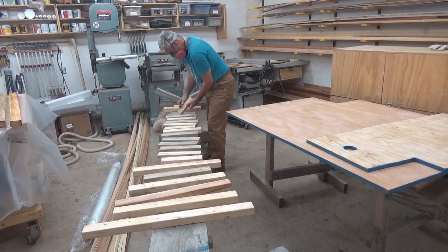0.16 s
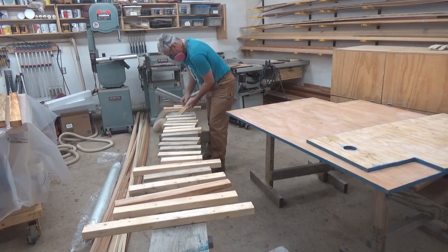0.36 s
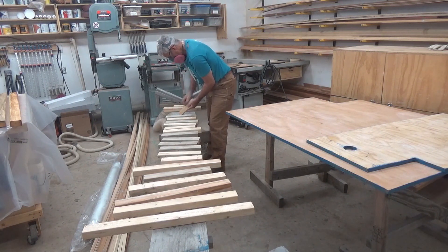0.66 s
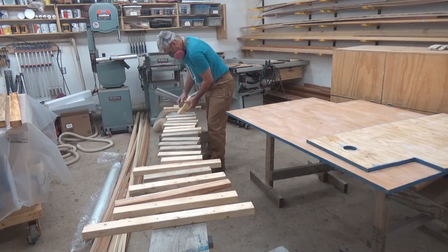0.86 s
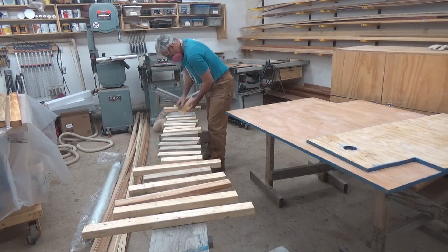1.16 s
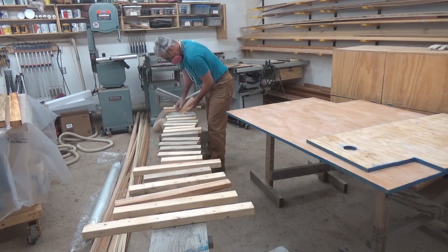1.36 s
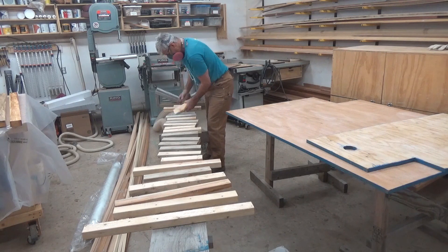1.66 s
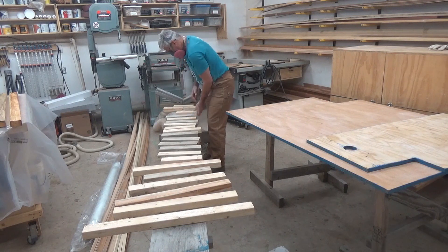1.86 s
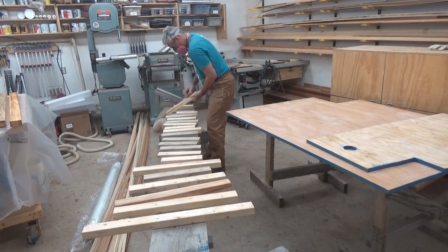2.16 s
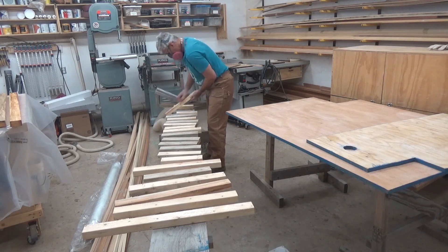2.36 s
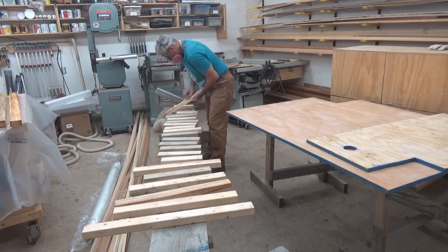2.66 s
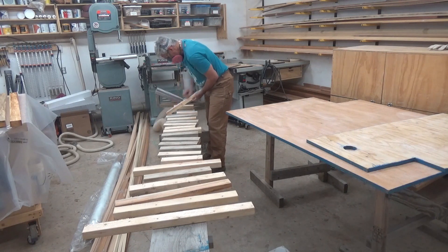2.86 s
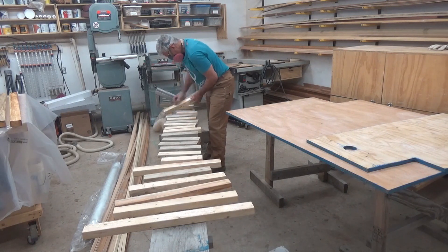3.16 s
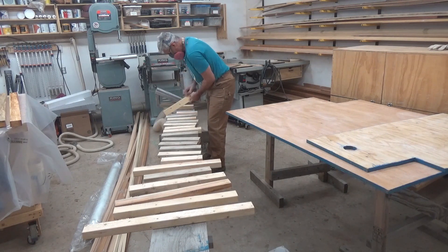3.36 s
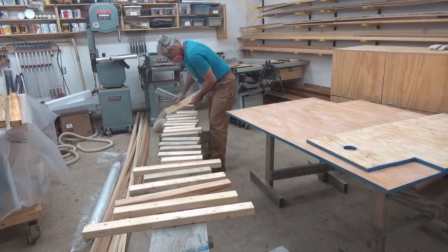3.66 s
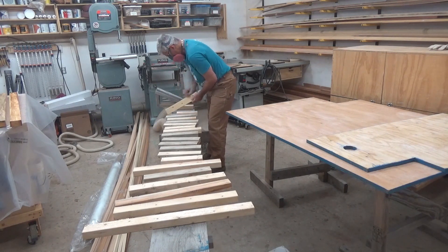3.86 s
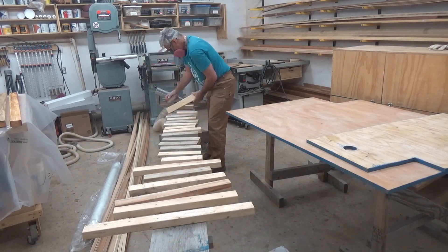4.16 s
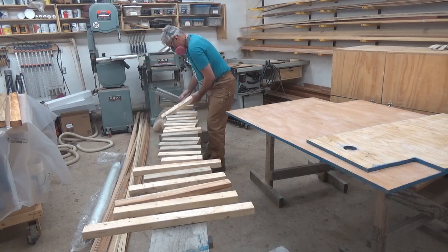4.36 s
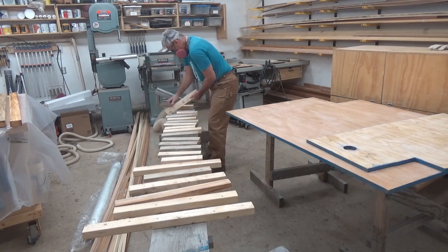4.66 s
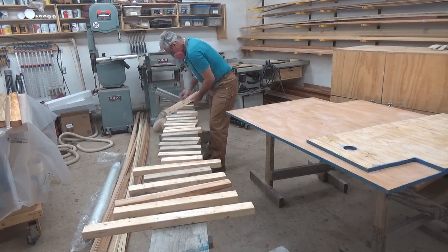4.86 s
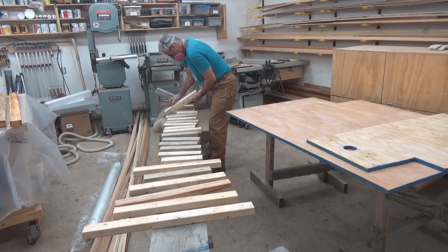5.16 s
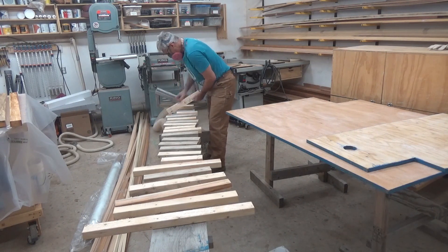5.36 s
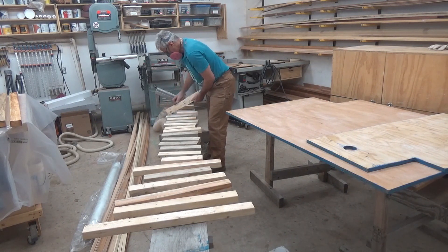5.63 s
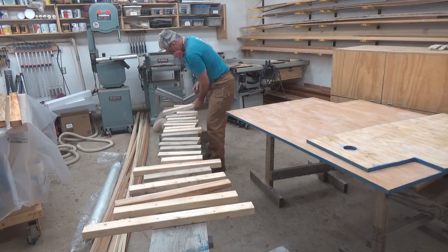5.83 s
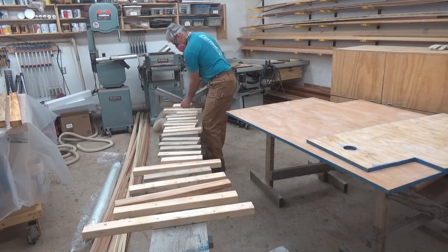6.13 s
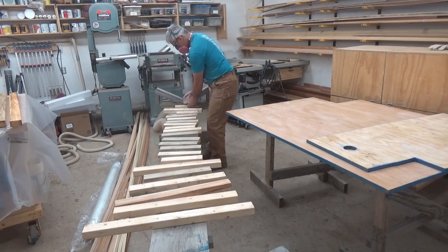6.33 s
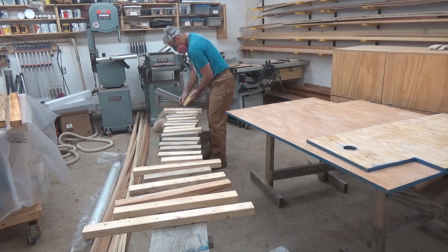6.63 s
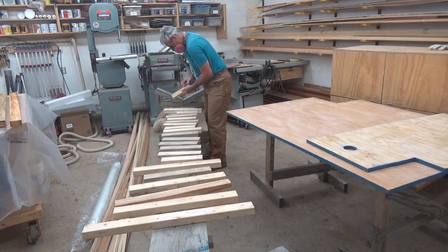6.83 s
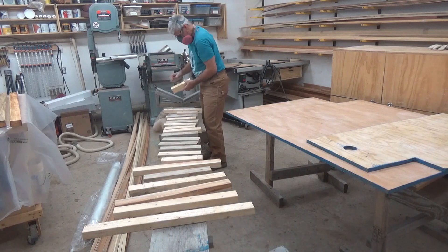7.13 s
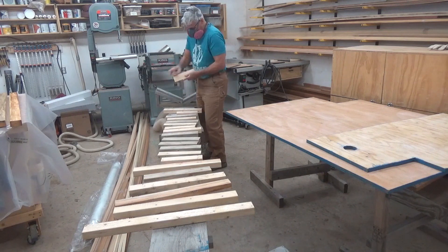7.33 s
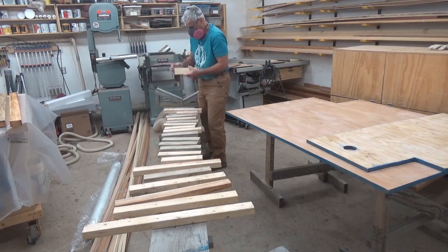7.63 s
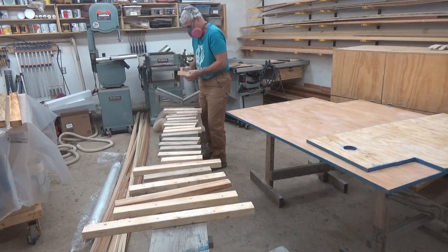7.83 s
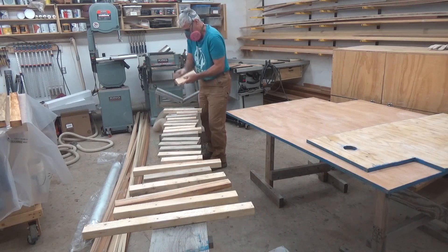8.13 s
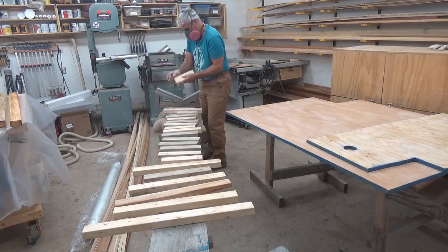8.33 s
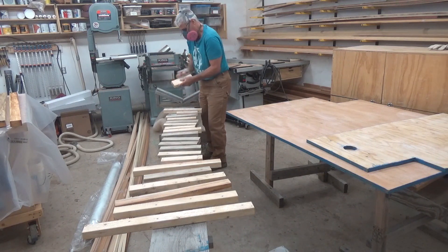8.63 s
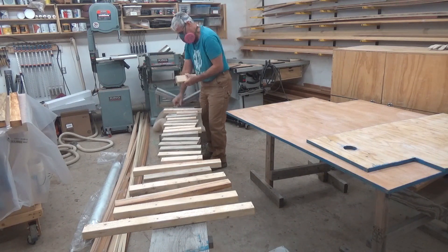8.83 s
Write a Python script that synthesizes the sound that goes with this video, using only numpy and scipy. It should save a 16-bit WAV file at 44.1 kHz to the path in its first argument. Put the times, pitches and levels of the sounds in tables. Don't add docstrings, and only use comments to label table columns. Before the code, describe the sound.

Sandpaper rasps quickly back and forth on wooden battens in a hard workshop, with loose wood knocking and clattering between spells of sanding.

```python
import sys
import numpy as np
from scipy import signal
from scipy.fft import rfft, irfft
from scipy.io import wavfile
from scipy.ndimage import uniform_filter1d

SR = 44100
rng = np.random.default_rng(int(sys.argv[2]) if len(sys.argv) > 2 else 0)


def pcm_store(signal):
    levels = np.round(np.clip(np.atleast_2d(signal), -1, 1) * 32767)
    wavfile.write(sys.argv[1], SR, levels.astype(np.int16).T)


def linear_from_db(decibels):
    return 10 ** (np.asarray(decibels, float) / 20)


N = 396459
T = np.arange(N) / SR
HZ = np.fft.rfftfreq(N, 1 / SR)
SWAP_S = 6.2


def level(x, db):
    return x * linear_from_db(db) / np.sqrt(np.mean(x ** 2))


def along(points, hz):
    f, v = np.transpose(points)
    return np.interp(np.log(hz + 1), np.log(f), v)


def shape(x, gain):
    return irfft(rfft(x) * gain, N)


def bump(hz, width_hz):
    return 1 / (1 + 2j * (HZ - hz) / width_hz)


def modes(table):
    return sum(linear_from_db(db) * bump(hz, width_hz) * (-1) ** k for k, (hz, width_hz, db) in enumerate(table))


def band_noise(noise, order, low_hz, high_hz):
    sos = signal.butter(order, [low_hz, high_hz], "band", fs=SR, output="sos")
    return signal.sosfilt(sos, noise)


def walk(rate):
    k = int(SR / rate)
    return uniform_filter1d(np.repeat(rng.standard_normal(N // k + 1), k), k)[:N]


def add(track, s, sound):
    i = int(s * SR)
    track[i:i + len(sound)] += sound[:N - i]


def grit(per_s, scatter_db):
    hits = rng.random(N) < per_s / SR
    return hits * rng.standard_normal(N) * linear_from_db(scatter_db * rng.exponential(size=N))


def swells(rows, power, lag_s=0.):
    out = np.zeros(N)
    for s, db, rise_s, fall_s in rows:
        rise_s = rise_s + lag_s
        peak_s = s + lag_s
        i = slice(max(int((peak_s - rise_s) * SR), 0), int((peak_s + fall_s) * SR))
        late = T[i] - peak_s
        speed = np.abs(np.cos(np.pi / 2 * late / np.where(late < 0, rise_s, fall_s)))
        out[i] += linear_from_db(2 * db) * speed ** (2 * power)
    return uniform_filter1d(np.sqrt(out), size=200)


# (time of top speed [s], rasp level [dB], rise [s], fall [s], pressure [dB])
BATTEN_STROKES = [(0.07, -24.5, 0.15, 0.16, -5), (2.465, -33.5, 0.09, 0.14, -4),
                  (2.689, -22.5, 0.15, 0.2, 0), (3.022, -21.5, 0.17, 0.088, -0.5),
                  (3.205, -21.5, 0.19, 0.19, 1), (3.47, -25.5, 0.17, 0.15, 0),
                  (3.665, -21.5, 0.13, 0.14, 0), (3.907, -25.5, 0.19, 0.13, 0.5),
                  (4.12, -21, 0.13, 0.14, -1), (4.33, -26, 0.17, 0.17, -0.5),
                  (4.528, -22, 0.12, 0.13, -1.5), (4.75, -26.5, 0.21, 0.16, -0.5),
                  (4.966, -21.5, 0.12, 0.14, 0), (5.189, -24.5, 0.19, 0.14, -0.5),
                  (5.397, -21, 0.14, 0.16, -1.5), (5.623, -25, 0.157, 0.17, -1),
                  (5.846, -25.5, 0.13, 0.14, -4)]
# (time of top speed [s], rasp level [dB], rise [s], fall [s], pressure [dB])
BLOCK_STROKES = [(6.559, -20, 0.118, 0.11, 3), (6.769, -18, 0.14, 0.15, 2), (7.02, -22, 0.18, 0.12, 2),
                 (7.243, -19, 0.15, 0.14, 2), (7.472, -21, 0.16, 0.14, 0.5), (7.69, -19.5, 0.15, 0.17, 1.5),
                 (7.907, -21.5, 0.14, 0.15, -0.5), (8.129, -20.5, 0.14, 0.15, 1),
                 (8.366, -25, 0.21, 0.15, 0.5), (8.574, -22, 0.14, 0.15, -1.5), (8.819, -28, 0.26, 0.18, 0),
                 (9.006, -32, 0.09, 0.14, -3)]
# (time [s], rasp level [dB], rise [s], fall [s], pressure [dB])
PUSHES = [(.06, -27.5, 0.11, 0.14, 5), (2.46, -29.5, 0.089, 0.047, 3.5), (2.51, -35, 0.064, 0.045, 9.5),
          (5.89, -34.5, 0.072, 0.056, 8.5), (2.63, -24, 0.056, 0.19, 1.5), (3.05, -26.5, 0.055, 0.024, 0),
          (3.2, -24.5, 0.062, 0.054, -8), (4.11, -27.5, 0.037, 0.088, -8), (5.87, -42, 0.064, 0.021, -4),
          (6.5, -24, 0.066, 0.1, 5), (8.82, -30.5, 0.044, 0.022, -11)]


def strokes(db, strength, power, share, lag_s, block_db):
    usual_db = -22
    rows = []
    for s, rasp_db, rise_s, fall_s, press_db in BATTEN_STROKES + BLOCK_STROKES + PUSHES:
        peak_db = usual_db + db + strength * (rasp_db - usual_db) + share * press_db
        rows.append((s, peak_db + block_db * (s > SWAP_S), rise_s, fall_s))
    return swells(rows, power, lag_s)


# (frequency [Hz], density [dB per Hz])
RASP_BATTEN = [(35, -47), (60, -33), (103, -14), (178, -16.5), (203, -13.5), (329, -5.5), (409, -13),
               (487, -8), (780, -18), (999, -10), (1220, -14.5), (2970, -6), (4210, -2), (5240, -1),
               (11000, -3), (14300, -45), (22000, -120)]
# (frequency [Hz], density [dB per Hz])
RASP_BLOCK = [(35, -46), (60, -15), (101, -8.5), (182, -15.5), (288, -7), (436, -9), (476, -5),
              (780, -16.5), (978, -8), (1220, -15), (1720, -10), (2050, -9.5), (3460, -2.5), (5970, 0),
              (11000, -1.5), (14300, -46), (22000, -120)]
# (frequency [Hz], width [Hz], level [dB])
BATTEN = [(2193, 310, -6), (2900, 115, -1.5), (3460, 190, -6.5), (5170, 390, -5.5), (5910, 490, -2.5)]
# (frequency [Hz], width [Hz], level [dB])
BLOCK = [(1675, 79, -17), (2990, 160, 0.5), (3460, 59, 3), (5060, 320, 5), (5300, 680, 3), (6400, 400, 1)]
# (level [dB], strength share
# [1], speed power [1], pressure share [1], lag [s], extra on block [dB])
RASP_LAW = (-0.22, 1.06, 1.32, -0.28, 0.016, 0.19)
HISS_LAW = (1.37, 1.16, 1.51, -0.54, -0.012, -0.48)
BOARD_LAW = (-5, 0.7, 0.65, 0.79, -0.0233, 2)
BODY_LAW = (-8, 0.93, 1, 0.8, -0.01, 1.5)
RUMBLE_LAW = (-17, 1, 1.06, -0.07, 0.28, -1)


def sanding():
    fine = grit(30000, .8) * linear_from_db(.6 * walk(60) + .8 * walk(150))
    coarse = grit(800, 1.8) * linear_from_db(3 * walk(14))
    woods = []
    for spectrum, wood in ((RASP_BATTEN, BATTEN), (RASP_BLOCK, BLOCK)):
        hiss = level(shape(fine, linear_from_db(along(spectrum, HZ))), 0.25)
        pings = level(shape(coarse, modes(wood)), -10)
        woods.append(hiss + pings)
    rasp = np.where(T < SWAP_S, *woods)
    low, body, middle, high = (1 / (1 + (HZ / edge_hz) ** 8) for edge_hz in (1164, 2420, 4460, 7100))
    layers = [(high - middle, -.8, RASP_LAW), (1 - high, -.6, HISS_LAW), (middle - body, -1.4, BOARD_LAW),
              (body - low, -2.5, BODY_LAW), (low, -3.5, RUMBLE_LAW)]
    out = np.zeros(N)
    for band, db, law in layers:
        flicker = linear_from_db(.7 * walk(30))
        out = out + level(shape(rasp, band), db) * strokes(*law) * flicker
    return out


# (time [s], peak level [dB], frequency [Hz])
CATCHES = [(2.4058, -22, 4940), (2.5754, -16, 3640), (2.6168, -4, 5370), (2.91, -15, 7610),
           (3.014, -1, 5300), (3.0499, 3.5, 4670), (3.118, -10, 6220), (3.17, -1, 5840), (3.203, -1, 5070),
           (3.5896, -9, 6260), (4.4686, -7, 5300), (6.4582, -10, 3350), (6.4814, 1, 5170), (6.521, 5, 3480),
           (6.5816, 5, 4400), (6.6849, 4.5, 4700), (6.79, -2, 3100), (6.825, -3, 2900), (6.9896, 1, 6660),
           (7.0722, 1, 4670), (7.1504, 0, 5300), (7.5092, 3.5, 4340), (7.614, -1, 5100), (7.6943, -3, 5590),
           (7.8819, -9, 6840), (7.9647, -1, 4930), (8.057, -3, 3550), (8.1363, -3, 5590),
           (8.3294, -3.5, 5260), (8.411, 0, 4400), (8.428, -8, 3460), (8.506, 1, 4400)]


def catches():
    out, t = np.zeros(N), T[:SR // 20]
    for s, db, hz in CATCHES:
        tear = rng.standard_normal(len(t))
        pitched = level(band_noise(tear, 2, hz * 0.86, hz * 1.14), 0)
        wide = level(band_noise(tear, 2, 2900, 6600), 1.5)
        envelope = (1 - np.exp(-t / 0.0014)) * np.exp(-t / 0.0084)
        add(out, s, level((pitched + wide) * envelope, db - 23.0))
    return out


def flecks(count=600):
    out, t = np.zeros(N), T[:SR // 40]
    low_hz, high_hz, peak_s = 3000, 7500, .0013
    for when, pitch, size, slide in rng.random((count, 4)):
        hz = low_hz * (high_hz / low_hz) ** pitch * (1 + 8 * (slide - .5) * t)
        envelope = t / peak_s * np.exp(1 - t / peak_s)
        add(out, when * T[-1], linear_from_db(7.5 * size) * np.sin(2 * np.pi * hz * t) * envelope)
    return out * strokes(db=-4, strength=1, power=1.3, share=0, lag_s=0, block_db=4)


# (level [dB], strength share [1], speed power [1], pressure share [1], lag [s], extra on block [dB])
SING_LAW = (-25, 1.1, 3.5, 1.5, 0.07, -5)
# (time [s], level [dB], rise [s], fall [s])
SING_SWELLS = [(2.11, -52, .06, .05), (2.47, -38, 0.07, 0.074), (5.9, -44, 0.1, 0.1),
               (6.03, -45, 0.06, 0.1), (6.47, -43, 0.04, 0.07), (7.81, -44, 0.076, 0.1)]


def singing():
    hz = 1010 * (1 + 0.01184 * walk(25))
    steady = np.sin(2 * np.pi * np.cumsum(hz) / SR) * linear_from_db(2.2 * walk(40))
    rough = shape(grit(3000, 0.96), bump(997, 70))
    drive = np.hypot(strokes(*SING_LAW), swells(SING_SWELLS, 0.84))
    return (level(rough, -0.5) + level(steady, -2.0)) * drive


def ring(table, t):
    out = np.zeros(len(t))
    for hz, db, t60_s in table:
        detuned_hz = hz * (1 + 0.022 * rng.standard_normal())
        out = out + linear_from_db(db) * np.sin(2 * np.pi * detuned_hz * t) * 1000. ** (-t / t60_s)
    return out


# (time [s], peak level [dB], loudest mode [Hz], hardness [dB], t60 [s])
KNOCKS = [(0.085, -19.5, 328, -3, 0.049), (0.179, -23, 272, -8, 0.029), (0.787, -2.5, 314, -19, 0.041),
          (1.048, -6, 308, -11, 0.048), (1.2, -2, 315, -4, 0.032), (1.203, -1, 665, -5, 0.024),
          (1.219, -8, 500, 1.5, 0.042), (1.244, -1.5, 281, -2.5, 0.011), (1.279, -4.5, 330, -6, 0.042),
          (1.329, -8, 478, -13, 0.066), (1.36, -12.5, 420, -7, 0.042), (1.389, -16, 280, -4.5, 0.029),
          (1.674, -4, 329, -16.5, 0.04), (1.861, -24.5, 318, -7, 0.032), (1.938, -22, 344, -10, 0.05),
          (1.288, -6, 258, -4.5, 0.02), (6.109, -38, 220, -12, 0.081)]
# (time [s], peak level [dB], frequency [Hz])
BOUNCES = [(0.0, -17, 320), (0.026, -20, 285), (0.056, -16.5, 320), (0.25, -38, 247), (0.812, -20, 310),
           (0.872, -21, 300), (0.859, -20, 265), (0.898, -13, 273), (0.935, -19, 290), (1.029, -19, 328),
           (1.068, -22, 300), (1.09, -13, 345), (1.119, -17, 434), (1.706, -20, 249), (1.745, -16, 292),
           (1.795, -17, 236), (1.815, -20, 300), (1.905, -22, 350), (2.11, -25, 260), (2.02, -19.5, 322),
           (2.157, -23, 291), (6.032, -18, 316), (6.06, -17, 224), (6.156, -26, 252), (6.982, -29, 455),
           (7.318, -29, 474), (7.36, -27, 300), (7.39, -27, 310), (7.818, -26, 310), (8.242, -30, 498),
           (8.714, -29, 296)]
# (frequency [Hz], level [dB], t60 [s])
BENCH = [(211, -9, 0.064), (266, -5, 0.052), (420, -3, 0.026), (488, -11, 0.064), (614, -5, 0.028),
         (718, -15, 0.036), (993, -15.5, 0.036), (1255, -30, 0.025)]
# (frequency [Hz], level [dB])
WOOD = [(450, 5), (620, 6), (800, 1.5), (1100, -1), (1500, -10.5), (2100, -16), (3500, -32)]


def knocks():
    out, t = np.zeros(N), T[:SR // 3]
    bounce_hard_db, bounce_t60_s = -22, 0.032
    bounces = [(*row, bounce_hard_db, bounce_t60_s) for row in BOUNCES]
    for s, db, hz, hard_db, t60_s in sorted(KNOCKS + bounces):
        settling = 0.24 + 0.93 / (1 + (t / 0.016) ** 6)
        swell = (t / 0.0062) ** 2 / (1 + (t / 0.005) ** 2) * settling
        low = 0.29 * ring(BENCH, t) * (1 - np.exp(-t / 0.0062))
        low = low + ring([(hz, 0, 1.47 * t60_s)], t) * swell
        stack = [(f, along(WOOD, f) + 0.36 * rng.standard_normal(), 0.11 * (500 / f) ** 0.24)
                 for f in np.geomspace(450, 3800, num=30)]
        clatter = ring(stack, t) * (1 - np.exp(-t / 0.0021))
        crack = uniform_filter1d(rng.standard_normal(len(t)), size=5)
        crack = crack * np.exp(-t / 0.003) * (1 - np.exp(-t / 0.0022))
        blow = low / np.abs(low).max() + linear_from_db(hard_db - 9.5) * clatter + linear_from_db(hard_db - 10.0) * crack
        add(out, max(s - .0015, 0), linear_from_db(db - 3.5) * blow)
    return out


# (time [s], peak level [dB], frequency [Hz])
THUMPS = [(0.847, -24, 155), (1.288, -20.5, 152), (1.536, -28, 139), (1.7, -20, 146.4), (1.78, -21, 142.4),
          (2.198, -30, 150), (4.248, -27.5, 113), (5.099, -32.5, 106), (5.547, -39, 121),
          (5.936, -31, 94.5), (6.07, -35, 107), (6.697, -38, 109), (7.399, -31, 116), (8.269, -37, 103),
          (8.75, -38, 104)]


def thumps():
    out, t = np.zeros(N), T[:SR // 3]
    for s, db, hz in THUMPS:
        onset = 1 - np.exp(-(t / 0.007) ** 2)
        add(out, s - .01, linear_from_db(db - 1.0) * ring([(hz, 0, .2)], t) * onset)
    return out


# (frequency [Hz], width [Hz], level [dB])
SLIDE = [(2600, 1900, 1), (6200, 1350, 2), (9150, 1700, -9.5)]
# (time [s], level [dB],
# rise [s], fall [s])
SLIDES = [(.54, -50, .03, .04), (.75, -45.5, .06, .04), (.8, -43.5, 0.025, 0.089), (.91, -47, .05, 0.075),
          (1.0, -44.5, 0.041, .14), (1.165, -50, .03, .03), (1.22, -42, 0.041, 0.16),
          (1.75, -43, 0.1, 0.16), (1.91, -45.5, 0.11, 0.18), (2.15, -47, 0.23, 0.18),
          (6.17, -42.5, 0.2, 0.11), (6.4, -43, 0.21, 0.17), (2.14, -46, .015, .08), (6.46, -25, 0.051, .03)]
# (time [s], level [dB], rise [s], fall [s])
TRAILS = [
    (.13, -25.5, .1, 0.4),
    (5.94, -29.5, 0.099, 0.29),
]


def rubbing():
    gain = (0.38 + np.abs(modes(SLIDE))) / (1 + (1700 / (HZ + 1)) ** 4)
    rub = shape(grit(12000, 0.9), gain)
    return level(rub, -3.5) * np.hypot(swells(SLIDES, 1.9), swells(TRAILS, 5.1))


# (frequency [Hz], width [Hz], level [dB])
SQUEAK_LOW = [(2900, 110, 0), (3750, 130, -4)]
# (frequency [Hz], width [Hz], level [dB])
SQUEAK_HIGH = [(4950, 100, 0), (6350, 260, -3), (7600, 200, -4)]
# (time [s], level [dB], rise [s], fall [s], upper modes extra [dB])
SQUEAKS = [(.76, -65, .14, .1, -6), (.9, -65, .27, 0.29, 2), (1.0, -70, .1, .1, 10),
           (1.12, -57, 0.099, 0.17, -10)]


def squeaks():
    out = np.zeros(N)
    for upper, table in enumerate((SQUEAK_LOW, SQUEAK_HIGH)):
        rows = [(s, db + upper * up_db, rise_s, fall_s) for s, db, rise_s, fall_s, up_db in SQUEAKS]
        out = out + level(shape(grit(12000, 1.2), modes(table) ** 2), 3) * swells(rows, 0.95)
    return out


# (time [s], peak level [dB], frequency [Hz])
TICKS = [(0.788, -30, 3300), (1.049, -40, 1400), (1.2012, -36, 7000), (1.6736, -44, 4000),
         (2.1266, -35, 4500), (2.2827, -36, 2700), (2.2835, -42, 7500), (6.125, -29, 6500),
         (6.132, -32, 3300), (6.3689, -37, 4200)]


def ticks():
    out, t = np.zeros(N), T[:SR // 20]
    for s, db, hz in TICKS:
        burst = rng.standard_normal(len(t)) * np.exp(-t / 0.004)
        tick = band_noise(burst, 1, hz * 0.7, hz * 1.4)
        add(out, s, linear_from_db(db) * tick / np.abs(tick).max())
    return out


# (frequency [Hz], t60 [s])
ROOM_T60 = [(100, 0.78), (400, 0.45), (1500, 0.54), (5000, 0.34), (11000, 0.079)]


def echoes():
    t, tail = T[:SR], 0
    for hz in 60 * 2. ** np.arange(8):
        octave = band_noise(rng.standard_normal(SR), 2, hz / np.sqrt(2), hz * np.sqrt(2))
        tail = tail + octave * 1000. ** (-t / along(ROOM_T60, hz))
    tail = tail * (1 - np.exp(-t / 0.0035))
    return tail / np.sqrt(np.sum(tail ** 2))


def room(x, wet_db, count=4):
    shares = np.array([walk(4.5) for _ in range(count)])
    shares = shares / np.sqrt(np.sum(shares ** 2, axis=0))
    return linear_from_db(wet_db) * sum(signal.fftconvolve(x * share, echoes())[:N] for share in shares)


# (frequency [Hz], density [dB per Hz])
HUM = [(15, -68), (25, -23), (64, -3), (131, -7.5), (247, -4.5), (319, -7.5), (492, -7), (778, -12),
       (907, -13.5), (1260, -15.5), (3970, -30), (4400, -26), (11000, -33.5), (14300, -80), (22000, -120)]


def hum():
    noise = shape(rng.standard_normal(N), linear_from_db(along(HUM, HZ)))
    return level(noise, -43.5) * linear_from_db(0.3 * walk(2.55))


# (frequency [Hz], level under mid [dB])
SIDE_DB = [(30, -28), (100, -22.5), (400, -20), (1400, -21), (3000, -25), (6000, -17.5), (11000, -15)]


def scene():
    rasp = sanding() + catches() + flecks() + rubbing() + squeaks() + ticks() + singing()
    wood = knocks() + thumps()
    mid = rasp + room(rasp, -10.5) + wood + room(wood, -8) + hum()
    side = room(rasp + 0.46 * wood, 0.24, count=2) + linear_from_db(5.0) * hum()
    side = shape(side, linear_from_db(along(SIDE_DB, HZ)))
    return np.array([(mid + side) * linear_from_db(0.94), (mid - side) * linear_from_db(0.35)])


def top_cut(x):
    return signal.sosfilt(signal.butter(12, 12370, fs=SR, output="sos"), x)


# (frequency [Hz], width [Hz], depth [0-1])
NOTCH = [(4280, 740, 0.34), (6960, 3900, 0.21), (2075, 330, 0.35)]


def record(dry):
    top_hz = 11035
    housing = np.prod([1 - depth * np.abs(bump(hz, width_hz)) ** 2 for hz, width_hz, depth in NOTCH], axis=0)
    soft = np.tanh(1.1 * np.array([shape(ch, housing) for ch in dry])) / 1.1
    cut = np.array([shape(ch, 1 / (1 + (HZ / top_hz) ** 800)) for ch in soft])
    return top_cut(cut)


dry = scene()
out = record(dry)
pcm_store(out)
```